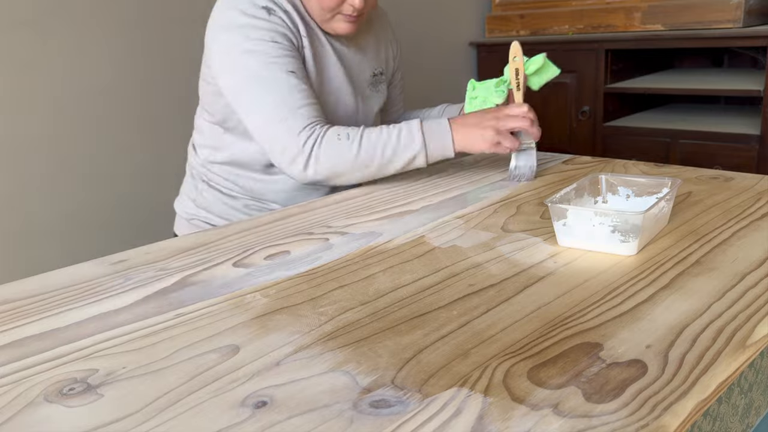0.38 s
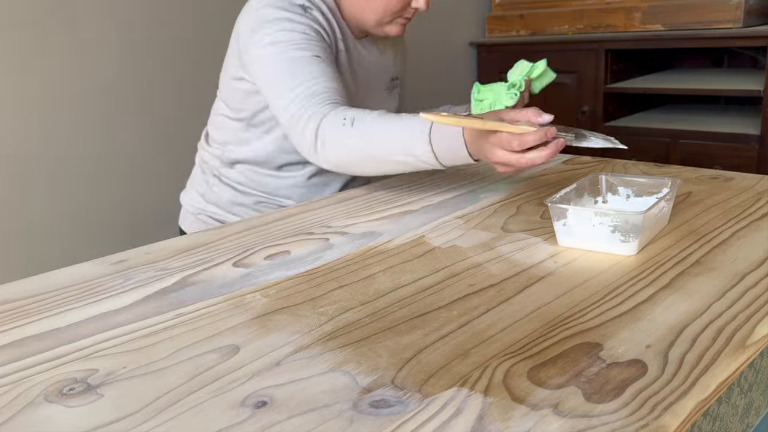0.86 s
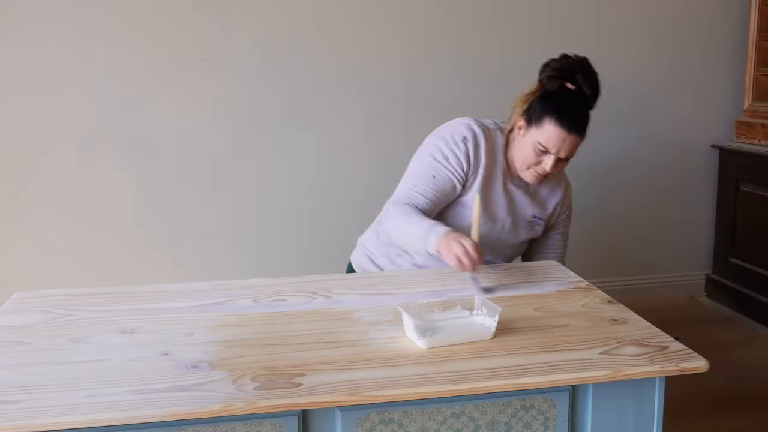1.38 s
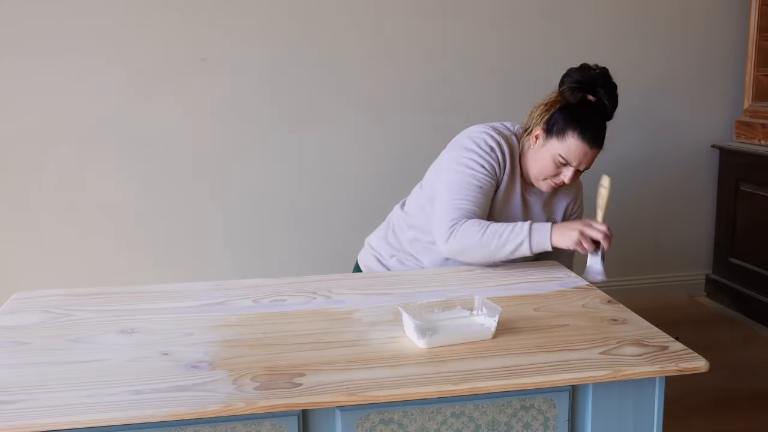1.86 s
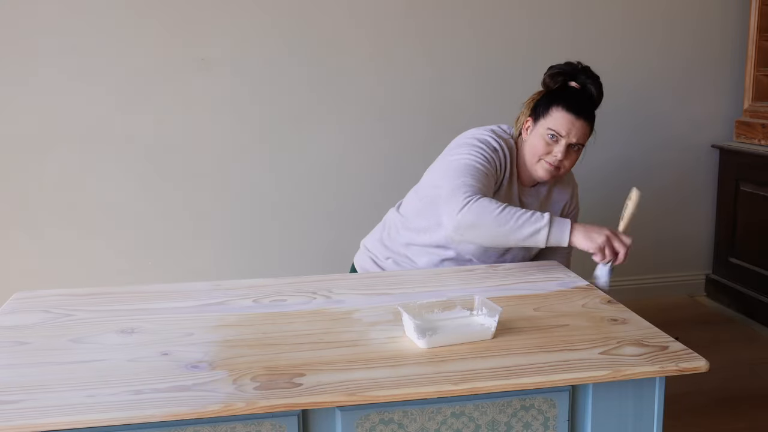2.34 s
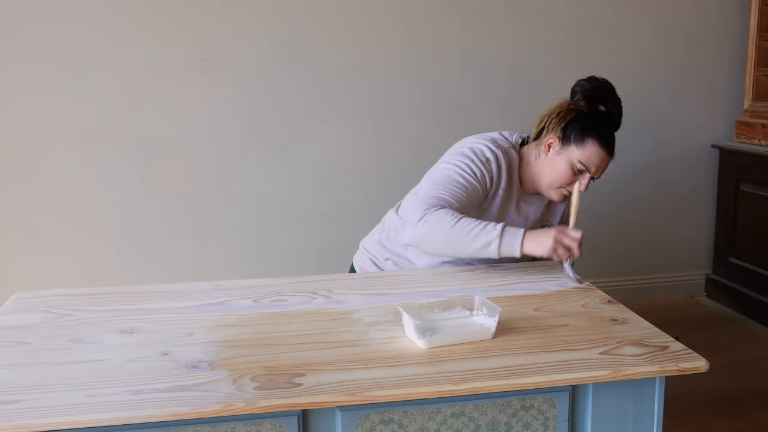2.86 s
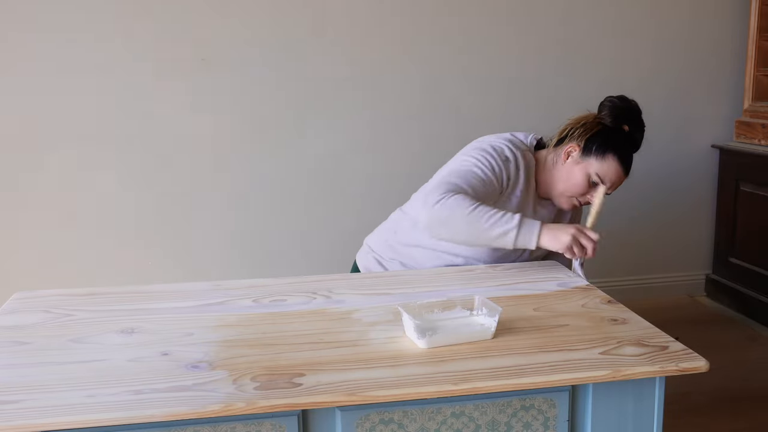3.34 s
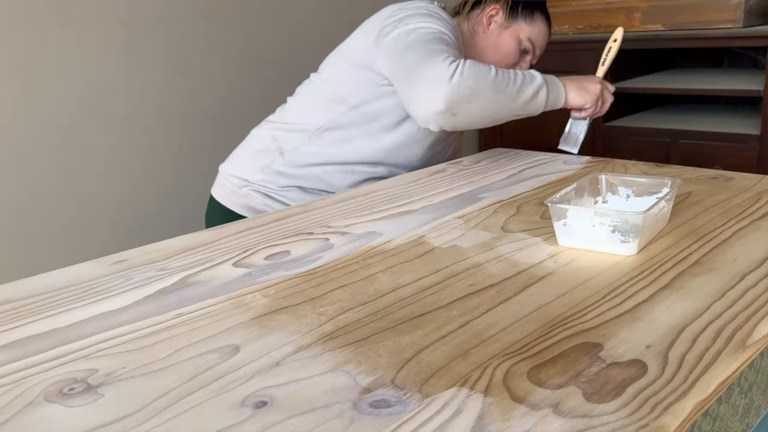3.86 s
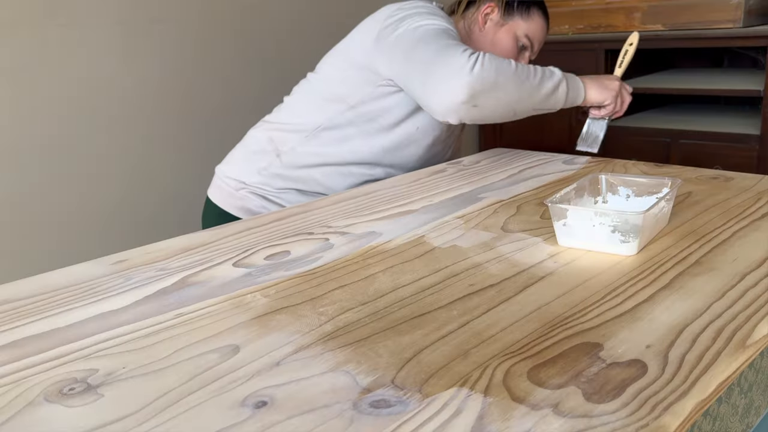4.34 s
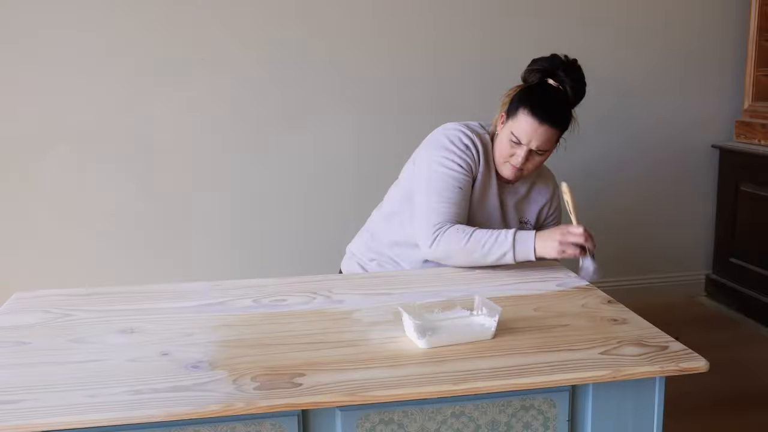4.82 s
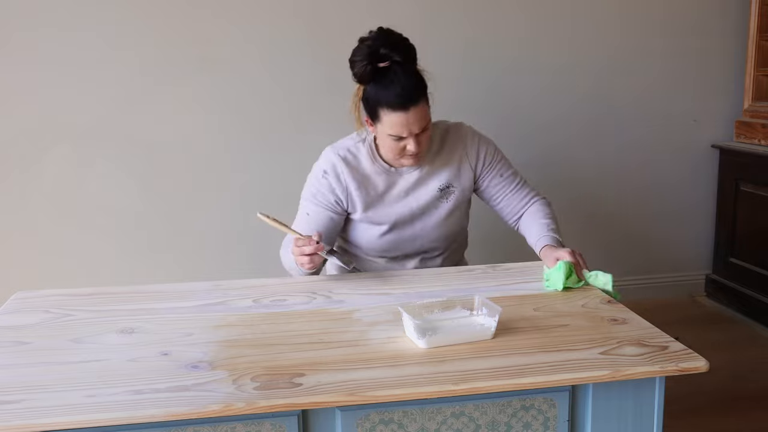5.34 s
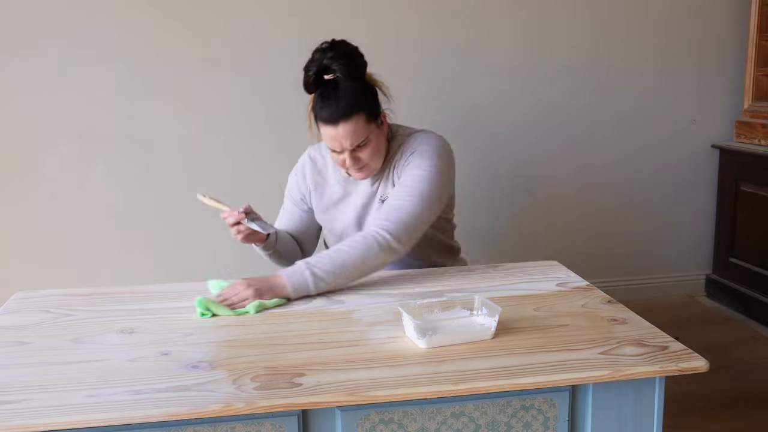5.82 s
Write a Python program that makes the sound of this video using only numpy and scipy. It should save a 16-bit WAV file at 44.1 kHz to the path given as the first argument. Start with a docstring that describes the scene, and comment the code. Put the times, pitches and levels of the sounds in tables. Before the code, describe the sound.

Close-up handwork on a wooden tabletop in a small, quiet room with a faint hollow wash and short echo. From 0 to 0.45 s a stiff brush makes wet swishes, with a sharp slap and snap near 0.13 s. It quiets, then dull plastic tub knocks rattle around 0.65-0.7 s. After a tiny dip at 0.94 s, steady bristle scrubbing runs over a low, uneven board hum. Light taps begin near 1.9 s; from 2.2 to 3.7 s quick dabs come about every 0.1 s, varying between crisp slaps, woody thumps and small metallic ticks. The sound nearly vanishes at 3.74 s, then dabs continue until 4.4 s. A dip at 4.5 s leads to scrubbing, with one slap at 4.88 s. A soft hand landing comes at 5.25 s; from 5.5 s to the end near 6.2 s, cloth rubs back and forth, louder and brighter, easing briefly at 5.9 s.

```python
"""Brush and cloth on a wooden tabletop

A wide paintbrush scrubs a wash over the wood, knocks its paint tub, dabs quickly, and a cloth then rubs the top.
Bristles and cloth are dense noise grains of uneven size, coloured in bands and moved by stroke curves.
The same strokes drive a low hum in the board; dabs are short noise bursts, clicks and struck resonances.
Shaped noise makes a quiet room, a noise tail echoes the knocks and dabs, and the level dips briefly three times."""
import sys
import numpy as np
from scipy import signal
from scipy.fft import rfft, irfft, next_fast_len
from scipy.io import wavfile
from scipy.ndimage import uniform_filter1d

SR = 44100
rng = np.random.default_rng(int(sys.argv[2]) if len(sys.argv) > 2 else 0)


def invert_db(level):
    """Linear amplitude ratio for a level in decibels (20 dB per decade), elementwise."""
    return 10 ** (np.asarray(level, dtype=float) / 20)


def dump(signal):
    """Clip the signal to [-1, 1] and save it as 16-bit WAV at the path in sys.argv[1]."""
    limited = np.clip(np.atleast_2d(signal).T, -1, 1)
    pcm = np.round(limited * 32767).astype(np.int16)
    wavfile.write(sys.argv[1], SR, pcm)


N = 273638


def at_hz(points, hz):
    """Reads a spectrum along log frequency."""
    corner_hz, db = np.transpose(points)
    return np.interp(np.log(hz + 1), np.log(corner_hz), db)


def in_time(rows):
    """Joins the rows of each column into a curve with one value per sample."""
    s, *columns = np.transpose(rows)
    return [np.interp(np.arange(N) / SR, s, column) for column in columns]


def rms_one(x):
    """Scales to unit power."""
    return x / np.sqrt(np.mean(x ** 2) + 1e-20)


def drift(rate_hz):
    """Slow random wander of unit power: noise through two equal low-pass poles, drawn every 40 samples."""
    pole = np.exp(-80 * np.pi * rate_hz / SR)
    noise = rng.standard_normal(N // 40 + 2002)
    slow = signal.lfilter([1], [1, -2 * pole, pole * pole], noise)[2000:]   # the filter has settled
    return np.interp(np.arange(N) / 40, np.arange(len(slow)), rms_one(slow))


def slips(spread_db):
    """Dense tiny slips of uneven size; two unrelated streams serve as mid and side."""
    sizes = invert_db(spread_db * np.minimum(rng.exponential(1, (2, N)), 4))
    return rng.standard_normal((2, N)) * sizes


def highpass(x, hz):
    """Second-order high-pass filter."""
    return signal.sosfilt(signal.butter(2, hz, "high", fs=SR, output="sos"), x)


def resonate(x, modes):
    """Parallel two-pole resonances of alternating sign."""
    out = 0
    for k, (hz, width_hz, db) in enumerate(modes):
        r = np.exp(-np.pi * width_hz / SR)
        feed = np.array([1, 0, -1]) * (1 - r * r) / 2
        back = [1, -2 * r * np.cos(2 * np.pi * hz / SR), r * r]
        out = out + (-1) ** k * invert_db(db) * signal.lfilter(feed, back, x)
    return out


def clicks(starts, strength_db):
    """One single-sample contact per start time."""
    out = np.full(N, 1e-18)
    out[np.round(starts * SR).astype(int)] = invert_db(strength_db)
    return out


# Stereo width of every noise layer. Each row: frequency in Hz, side against mid in dB.
STEREO_WIDTH = [(60, -18), (150, -20), (380, -14), (950, -11.5), (2380, -18), (5980, -20.5), (10000, -12.5),
                (15000, -4)]


def bands(source, spectrum):
    """Colours mid and side, then deals out left-right pairs in overlapping half-octave bands."""
    size = next_fast_len(N)
    hz = np.arange(size // 2 + 1) * SR / size
    mid, side = rfft(source, size) * invert_db(at_hz(spectrum, hz))
    side = side * invert_db(at_hz(STEREO_WIDTH, hz))
    both = np.array([mid + side, mid - side])
    heard = (hz > spectrum[1][0]) & (hz < 6000)
    both = both * size / np.sqrt(2 * np.sum(np.abs(mid[heard]) ** 2))   # unit mid power below the treble
    for centre_hz in 40 * 2 ** np.arange(0, 9, .5):
        share = np.clip(1 - np.abs(2 * np.log2((hz + 1) / centre_hz)), 0, 1)
        if spectrum[0][0] / 2 < centre_hz < 2 * spectrum[-1][0]:
            yield centre_hz, irfft(both * share, size)[:, :N]


# Wet swishes that swell the hiss near 3.6 kHz.
# Each row: centre in seconds, half length in seconds (to 1/e of the lift), lift in dB.
SWISHES = [(0.0, 0.068, 12.5), (0.134, 0.022, 12.5), (0.336, 0.066, 16), (5.05, 0.044, 6), (5.86, 0.066, 3),
           (6.003, 0.029, 4.5)]
# Tone of a light touch: dip, lift, dip. Each row: frequency in Hz, width in Hz, strength in dB.
LIGHT_TOUCH = [(1230, 500, -1), (4600, 900, -9), (3200, 1300, -.5)]


def rubbing(strokes, spectrum, usual_treble_db, grain_db, patchy_db):
    """Hiss of slipping fibres: the treble rides its own curve and every band flickers a little."""
    hiss_db, treble_db, hum_db = in_time(strokes)
    t = np.arange(N) / SR
    extra_treble_db = treble_db - hiss_db - usual_treble_db
    swish_db = 0.2 + sum(db * np.exp(-((t - s) / half_s) ** 2) for s, half_s, db in SWISHES)
    hiss, together = 0, drift(40.0)
    for hz, band in bands(slips(grain_db), spectrum):
        lift = np.clip(np.log2(hz / 4500) / 0.74, 0, 1.05) * extra_treble_db
        swish = np.exp(-(np.log2(hz / 3600) / 0.58) ** 2) * swish_db
        flicker = patchy_db * (0.34 * together + drift(10.6))
        hiss = hiss + band * invert_db(lift + swish + flicker)
    lightness = np.clip((-extra_treble_db - 1.5) / 6, 0, 1)   # a dull stroke is a light one
    hiss = hiss - lightness * resonate(hiss, LIGHT_TOUCH)
    arriving = np.clip((t - strokes[0][0]) / .008 + 1, 0, 1)
    leaving = np.clip((strokes[-1][0] - t) / 0.027 + 1, 0, 1)
    touching = arriving * leaving
    return touching * invert_db(hiss_db) * hiss, touching * invert_db(hum_db)


# Brush strokes. Each row: time in seconds, bristle hiss in dB, treble fizz in dB, board hum in dB.
BRUSH_STROKES = [(0.0, -42, -32, -40.5), (0.1, -42, -44, -42.5), (0.14, -32, -35, -46),
                 (0.23, -39, -47, -47.5), (0.32, -42, -33, -50.5), (0.42, -40.5, -43, -39),
                 (0.46, -37.5, -60, -43.5), (0.95, -44, -62, -47.5), (0.98, -36, -39.5, -37),
                 (1.15, -35, -39, -34), (1.35, -34, -35, -36), (1.58, -32, -36, -36), (1.77, -35, -39, -35),
                 (2.12, -37, -39.5, -38.5), (2.26, -31.5, -35, -40), (2.4, -33.5, -44, -36.5),
                 (2.68, -35, -49, -40.5), (2.78, -33.5, -35, -35), (2.87, -35.5, -46.5, -41.5),
                 (3.44, -37, -56, -46), (3.72, -40.5, -57, -51.5), (3.78, -32, -37, -38.5),
                 (3.95, -35.5, -39.5, -38), (4.27, -34, -39, -39), (4.49, -34, -39, -40),
                 (4.53, -32.5, -33, -40), (4.7, -34.5, -38, -37), (4.84, -31, -35.5, -37.5),
                 (4.93, -34.5, -39.5, -36), (5.06, -32.5, -32.5, -36), (5.15, -37.5, -42.5, -38.5),
                 (5.38, -31, -36.5, -37), (5.52, -35, -41, -36.5)]
# Colour of the bristle hiss. Each row: frequency in Hz, level in dB per Hz.
BRISTLE_COLOUR = [(650, -21), (1100, -22), (1300, -11), (1860, 0.5), (3450, -4), (3810, -3.5), (7990, -3),
                  (13400, -12.5), (16000, -21.5)]


def brush():
    """Stiff bristles slip over wet wood; returns their hiss and their push on the board."""
    return rubbing(BRUSH_STROKES, BRISTLE_COLOUR, usual_treble_db=-2.0, grain_db=1.5, patchy_db=1.5)


# Broad colour of the humming tabletop. Each row: frequency in Hz, level in dB per Hz.
BOARD_COLOUR = [(24, -73), (40, -43), (85, -36.5), (123, -14.5), (193, -13), (240, -6), (278, -8), (361, 0),
                (610, -5), (804, -5.5), (1300, -21.5), (1690, -38), (2860, -120)]
# Modes of the tabletop, also heard in the thumps. Each row: frequency in Hz, width in Hz, level in dB.
BOARD_MODES = [(243, 50, -2), (361, 87, 4.5), (420, 65, 3.5), (550, 56, 0), (695, 110, -5.5), (802, 53, 3),
               (1025, 136, -4.5), (1523, 120, -2)]
# Balance of the rumble below 190 Hz. Each row: time in seconds, rumble against the hum in dB.
DEEP_RUMBLE = [(0, -6), (.2, -7.5), (.7, 0), (1.0, -1), (1.2, -1), (1.4, 3), (2.1, -8), (2.9, -2),
               (3.7, 0.5), (4.0, 2.5), (4.5, 1), (5.0, 0.5), (5.6, 0), (6.2, -15)]


def board(drive):
    """The tabletop hums under the stroke: broad low colour, part of it gathered in its modes."""
    deep_db, = in_time(DEEP_RUMBLE)
    together = drift(10.5)
    hum = 0
    for hz, band in bands(slips(3.65), BOARD_COLOUR):
        flicker = 1.9 * drift(7.7) + 2.22 * together
        hum = hum + band * invert_db(flicker + deep_db * (hz < 190))
    modes = rms_one(resonate(hum, BOARD_MODES)) * np.std(hum)
    return drive * rms_one(hum + 0.054 * modes)


# Colour of the room, for its tone and its echo. Each row: frequency in Hz, level in dB per Hz.
ROOM_COLOUR = [(30, -60), (50, -37), (130, -17), (380, -1), (800, -4.5), (1200, -29), (1600, -0.5),
               (2100, -6), (2700, -6), (3250, -0.5), (4300, -3), (5700, -9.5), (7000, -9), (16000, -55)]
# Loudness of the room tone. Each row: time in seconds, level in dB.
ROOM_LEVEL = [(0, -38.5), (.5, -45.5), (.93, -47), (.97, -39), (2.4, -42), (2.9, -41.5), (3.3, -41.5),
              (3.72, -44.5), (3.78, -39), (6.2, -35)]


def room_tone():
    """Hollow wash of the workspace: coloured noise whose bands wander slowly."""
    noise = rng.standard_normal((2, N))
    tone = sum(band * invert_db(3 * drift(3)) for hz, band in bands(noise, ROOM_COLOUR))
    level_db, = in_time(ROOM_LEVEL)
    return invert_db(level_db) * rms_one(tone)


def contact_tick(contacts):
    """Keeps the dry tick of a contact, 1.6 to 7.5 kHz."""
    return signal.sosfilt(signal.butter(4, [1600, 7500], "band", fs=SR, output="sos"), contacts)


# A stiff bristle snaps against the wood. Each row: start in seconds, click strength in dB.
BRISTLE_SNAPS = [(0.0495, -8), (0.1242, 3), (1.9874, -2), (2.5925, -2), (3.0915, -13)]


def snaps():
    """Bare band-limited clicks of opposite polarity to the ticks of the dabs."""
    starts, strength_db = np.transpose(BRISTLE_SNAPS)
    return -contact_tick(clicks(starts, strength_db))


def landing(starts, strength_db, t60, rise_s):
    """Sum of envelopes that jump up at each start and die away."""
    out = np.zeros(N)
    for s, db, fall_s in zip(starts, strength_db, t60):
        at = round(s * SR)
        t = np.arange(min(N - at, SR // 2)) / SR
        out[at:at + len(t)] += invert_db(db - 60 * t / max(fall_s, .004)) * (1 - np.exp(-t / rise_s))
    return out


# Colour of the slap, before each landing's own tilt. Each row: frequency in Hz, level in dB per Hz.
SLAP_COLOUR = [(530, -47), (900, 2), (1230, -0.5), (2170, 3.5), (2760, 3), (4410, -5), (5350, 2),
               (9500, 3.5), (12500, -6), (16000, -60)]


def slap(starts, strength_db, centre_hz, t60):
    """A crack and a dying splash of bristles, brightest around each landing's own centre."""
    out = 0
    for hz, band in bands(slips(5.0), SLAP_COLOUR):
        octaves = np.log2(hz / centre_hz)
        patches_db = 2.3 * rng.standard_normal(len(starts))
        colour_db = -3.0 * np.abs(octaves) - 1.1 * octaves ** 2 + patches_db
        lasting = t60 * (4000 / hz) ** 0.11   # treble dies first
        splash = landing(starts, strength_db + colour_db - 14.5, lasting, 0.0039)
        crack_db = strength_db - 3.5 * np.abs(octaves) - 4.8 * max(np.log2(hz / 8000), 0) - 13
        crack = landing(starts, crack_db, 0.1 * t60, .0001)
        out = out + band * (splash + crack)
    return out


# Modes of the brush's metal ferrule. Each row: frequency in Hz, width in Hz, level in dB.
FERRULE_MODES = [(2100, 220, -7), (4380, 150, 1), (4600, 170, -1), (5150, 200, -3), (6800, 350, -10),
                 (7400, 350, -11)]


def ferrule(starts, ring_db, t60):
    """A click and a short noisy jolt strike the metal modes, each landing favouring other ones."""
    ring, jolt = 0, rms_one(slips(3.3)[0])
    luck_db = 0.5 * rng.standard_normal((len(starts), len(FERRULE_MODES)))
    for mode, extra_db in zip(FERRULE_MODES, luck_db.T):
        struck_db = ring_db + extra_db
        shaken = jolt * landing(starts, struck_db + 2.0, 0.38 * t60, 0.00059)
        ring = ring + resonate(shaken + clicks(starts, struck_db + 11.5), [mode])
    return signal.sosfilt(signal.butter(2, 8500, fs=SR, output="sos"), ring)


def thump(starts, thump_db, t60):
    """A short push of noise sets off the board's modes."""
    push = rms_one(slips(4.6)[0]) * landing(starts, thump_db + 19.5, 1.3 * t60, 0.0022)
    return highpass(resonate(push, BOARD_MODES), 140)


# The brush, at last the hand, lands on the wood. Each row: start in seconds, slap strength in dB,
# board thump strength in dB, ferrule ring against the slap in dB, centre of the slap in Hz.
DAB_LANDINGS = [(0.1295, -12, -45, -10, 2400), (0.133, -23, -50, -12, 2220), (1.9174, -23, -45, -2, 4390),
                (1.9883, -23, -40, 0, 2140), (2.098, -25, -67, 4.5, 2270), (2.2194, -10.5, -34.5, -6, 1560),
                (2.3166, -14.5, -40.5, -8, 2300), (2.4108, -12.5, -40, 2.5, 4400),
                (2.5057, -14.5, -44, -4, 4500), (2.593, -20.5, -32.5, 8.5, 4100),
                (2.6843, -17.5, -55, -2.5, 2130), (2.7498, -10, -39, -17, 7510),
                (2.7864, -14.5, -65, -7, 2600), (2.885, -11.5, -34.5, -9, 2800),
                (2.9946, -14.5, -69, 2, 4670), (3.0909, -19, -62, 5.5, 4470), (3.18, -21.5, -47, 9.5, 4500),
                (3.271, -18, -42.5, 0.5, 6800), (3.3687, -27.5, -50, 6, 4110), (3.464, -11, -36, -5, 1960),
                (3.5596, -25, -47, 8, 6400), (3.6536, -27, -61, 11, 4160), (3.766, -26, -53, 6, 1800),
                (3.924, -14, -33, -12, 1930), (4.04, -16, -40, 2.5, 4200), (4.134, -16, -37, -5, 8410),
                (4.221, -16, -40, 3.5, 4560), (4.3, -27, -42.5, 6, 1920), (4.4016, -17.5, -36.5, -3, 3700),
                (4.883, -16, -45, -3, 3560), (5.254, -19, -32, -18, 2720), (5.268, -27, -41, -21, 1200),
                (5.3154, -41, -44, -7, 1920)]


def dabs():
    """Each landing layers a slap, a tick, a ferrule ring and a thump in the board."""
    starts, strength_db, thump_db, ring_db, centre_hz = np.transpose(DAB_LANDINGS)
    t60 = 0.17 * np.exp(-0.0192 * (strength_db + 9))   # seconds: a softer landing lasts a little longer
    tick = contact_tick(clicks(starts, strength_db - 1))
    ring = ferrule(starts, strength_db + ring_db, t60)
    return slap(starts, strength_db, centre_hz, t60) + tick + ring + thump(starts, thump_db, t60)


def walls(x):
    """Echo of the walls: a dying noise tail for each ear, in the colour of the room."""
    t60_s, gap_s, echo_db = 0.2, .006, -13.5
    t = np.arange(N) / SR
    tail = sum(band for hz, band in bands(rng.standard_normal((2, N)), ROOM_COLOUR))
    tail = (tail * invert_db(-60 * t / t60_s) * (t > gap_s))[:, :SR // 2]
    tail = tail / np.sqrt(np.sum(tail ** 2, axis=1, keepdims=True))
    return invert_db(echo_db) * signal.fftconvolve(x, tail, axes=1)[:, :N]


# The brush meets the plastic tub. Each row: start in seconds, knock strength in dB.
TUB_KNOCKS = [(0.648, -26), (0.662, -32), (0.677, -28), (0.691, -53), (.703, -31.5)]
# Modes of the tub. Each row: frequency in Hz, width in Hz, level in dB.
TUB_MODES = [(373, 110, 1.5), (520, 125, -1.5), (740, 130, 0.5), (890, 130, -10), (2260, 360, -6)]


def tub():
    """Dull knocks on thin plastic: a soft, rattling contact into the tub's modes."""
    starts, strength_db = np.transpose(TUB_KNOCKS)
    touch = clicks(starts, strength_db + 19)
    rattle_t60_s = 0.044
    envelope = signal.lfilter([1], [1, -invert_db(-60 / (rattle_t60_s * SR))], touch)
    rattle = envelope * rng.standard_normal(N)
    soft = signal.lfilter([.09], [1, -1.4, .49], rattle)   # two low-pass poles dull the contact
    return highpass(resonate(soft, TUB_MODES), 220)


# Cloth strokes, out and back. Each row: time in seconds, cloth hiss in dB, treble fizz in dB, board hum in dB.
CLOTH_STROKES = [(5.53, -28.5, -30, -39), (5.7, -28, -28.5, -37.5), (5.77, -25.5, -25, -41),
                 (5.86, -29.5, -28, -41.5), (5.914, -37, -38.5, -37.5), (5.984, -30, -27.5, -39.5),
                 (6.1, -28.5, -26, -41), (6.2, -29, -31, -44)]
# Colour of the cloth hiss. Each row: frequency in Hz, level in dB per Hz.
FABRIC_COLOUR = [(650, -13.5), (1100, -15), (1180, -15.5), (2200, -2), (2610, -4.5), (6830, -0.5),
                 (9660, -1.5), (14600, -12), (16000, -31)]


def cloth():
    """Woven fibres slip over the top; returns their hiss and their push on the board."""
    return rubbing(CLOTH_STROKES, FABRIC_COLOUR, usual_treble_db=0.2, grain_db=2.0, patchy_db=1.53)


def scene():
    """Brush, cloth, board, dabs, tub and room."""
    brush_hiss, brush_drive = brush()
    cloth_hiss, cloth_drive = cloth()
    hum = board(brush_drive + cloth_drive)
    hits = dabs() + snaps() + tub()
    return brush_hiss + cloth_hiss + hum + hits + walls(hits) + room_tone()


# Side gain by treble level: weak side is lifted under quiet treble and dropped under loud treble.
# Each row: level of the mid above 2 kHz in dB, gain of the side between 1.9 and 10.5 kHz in dB.
SIDE_GAIN = [(-42, 12), (-35, 10.5), (-31, 5), (-28, 4.5), (-11, -34.5)]


def side_gain(x):
    """Scales the middle treble of the side signal by the smoothed treble level of the mid."""
    smooth_s = 0.093
    treble = highpass((x[0] + x[1]) / 2, 2000)
    level_db = 10 * np.log10(uniform_filter1d(treble ** 2, int(smooth_s * SR)) + 1e-9)
    side = (x[0] - x[1]) / 2
    upper = signal.sosfiltfilt(signal.butter(2, [1900, 10500], "band", fs=SR, output="sos"), side)
    gain = invert_db(np.interp(level_db, *np.transpose(sorted(SIDE_GAIN))))
    return x + (gain - 1) * upper * [[1], [-1]]


# Brief dips of the whole level.
# Each row: lowest point in seconds, fade out in seconds, fade in in seconds, depth in dB.
LEVEL_DIPS = [(0.942, 0.0067, 0.013, -14), (3.74, 0.016, 0.037, -57), (4.504, 0.0067, 0.034, -18)]


def dips(x):
    """The level sinks to each low point and comes back along a curved fade."""
    t, gain = np.arange(N) / SR, 1
    for s, out_s, in_s, depth_db in LEVEL_DIPS:
        away = np.clip(np.where(t < s, (s - t) / out_s, (t - s) / in_s), 0, 1)
        floor = invert_db(depth_db)
        gain = gain * (floor + (1 - floor) * away ** 1.75)
    return x * gain


def top_cut(x):
    """Nothing passes above the cut-off."""
    return signal.sosfilt(signal.butter(12, 16310, fs=SR, output="sos"), x)


def record(dry):
    """Side gain by treble level, then the brief dips."""
    mix = dips(side_gain(dry))
    return top_cut(mix)


dry = scene()
out = record(dry)
dump(out)
```